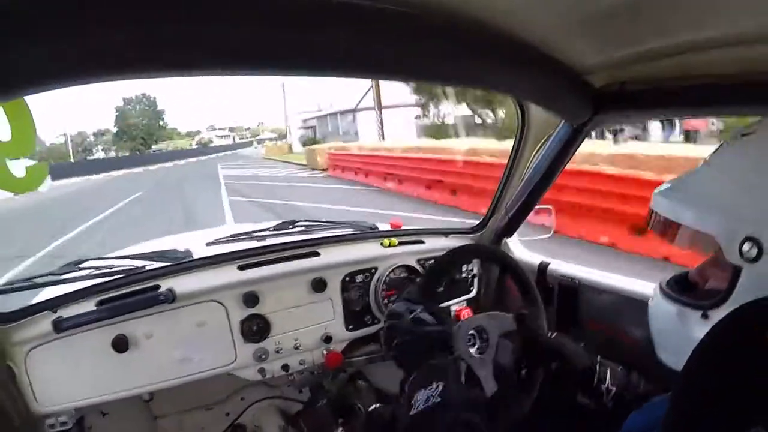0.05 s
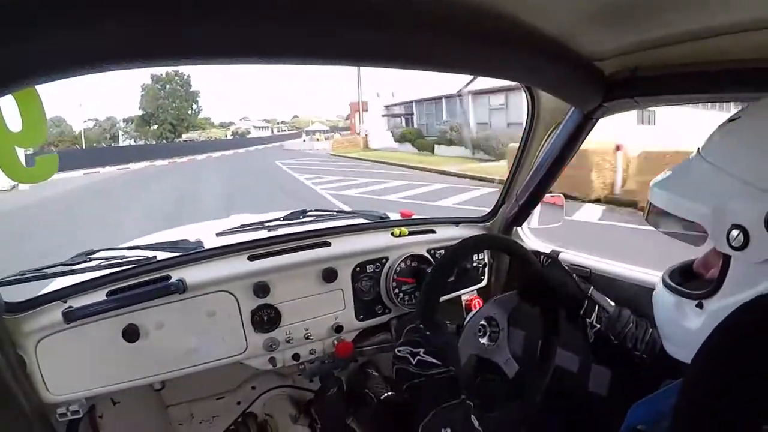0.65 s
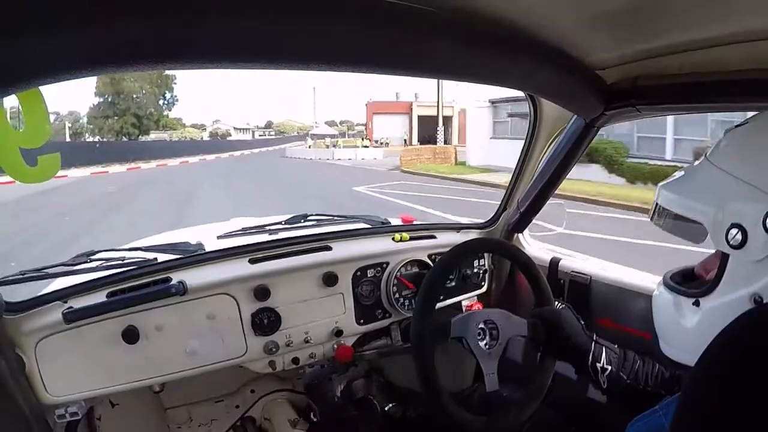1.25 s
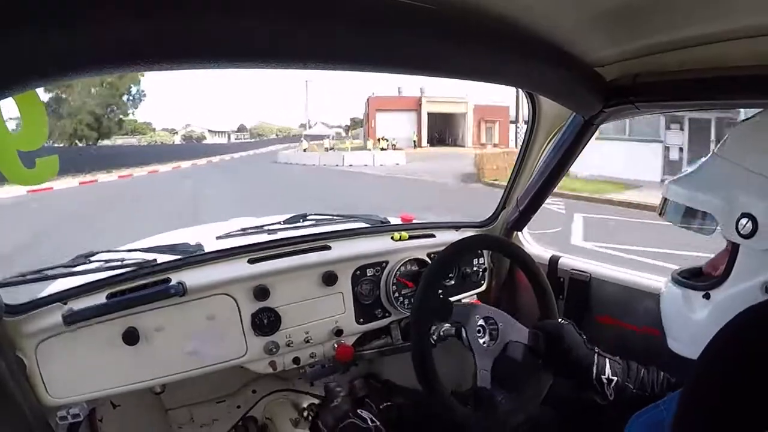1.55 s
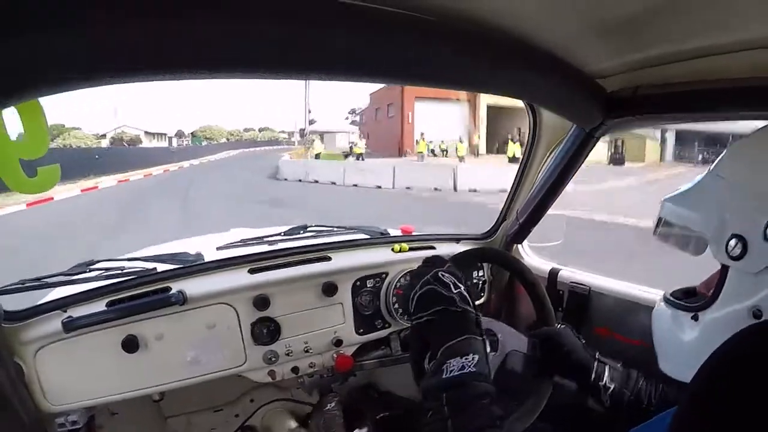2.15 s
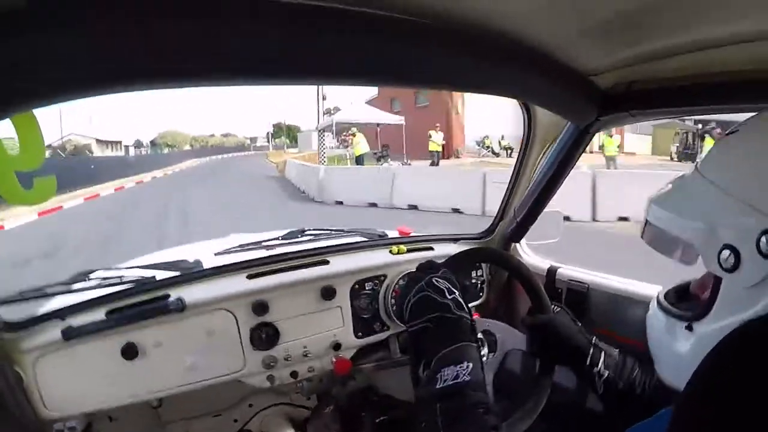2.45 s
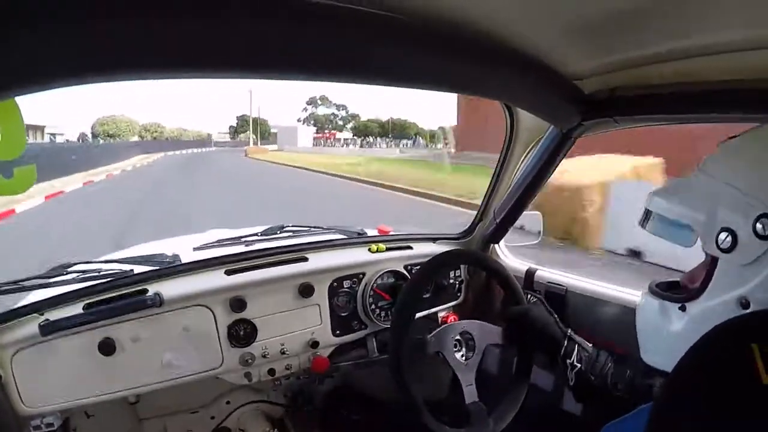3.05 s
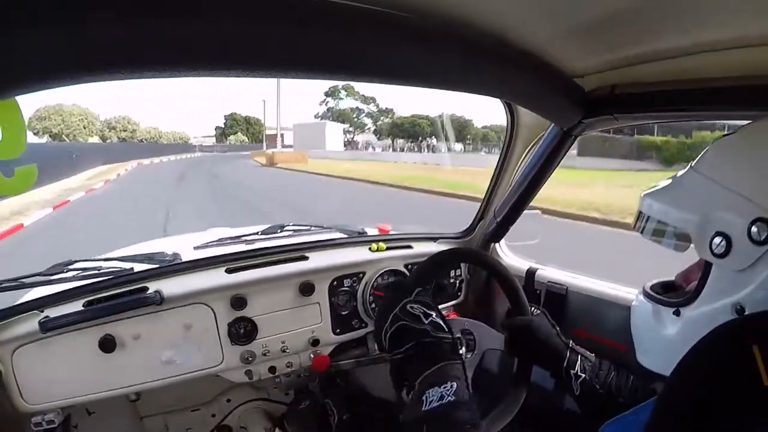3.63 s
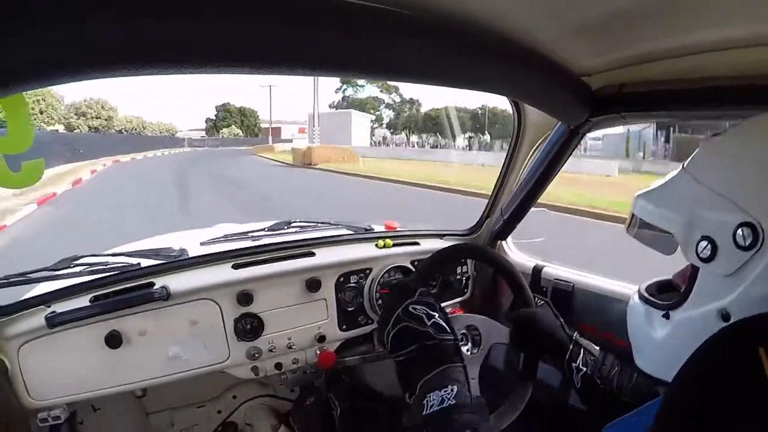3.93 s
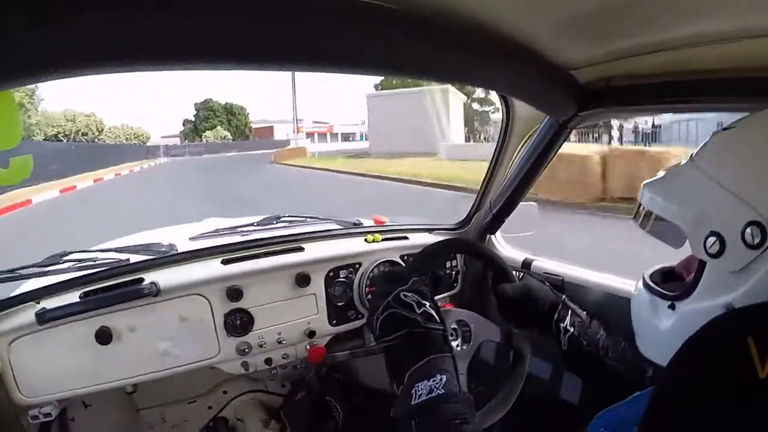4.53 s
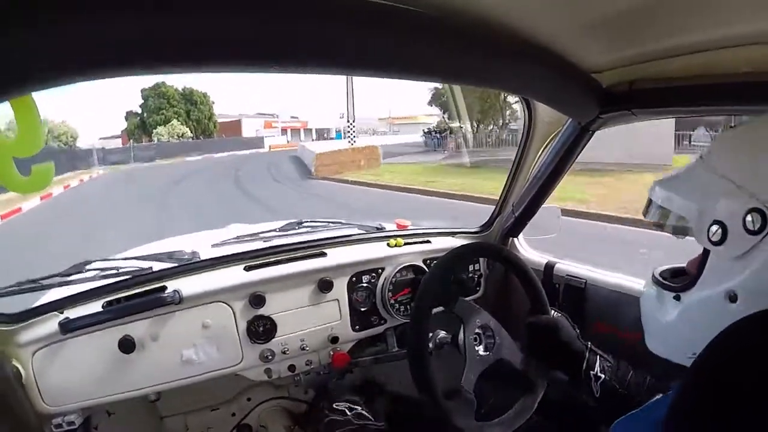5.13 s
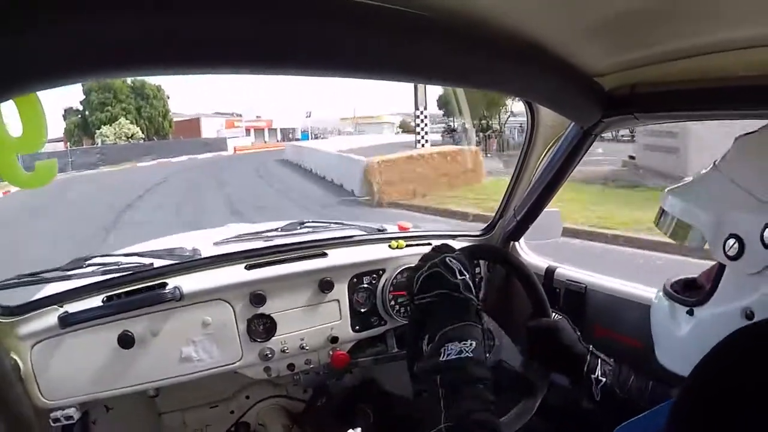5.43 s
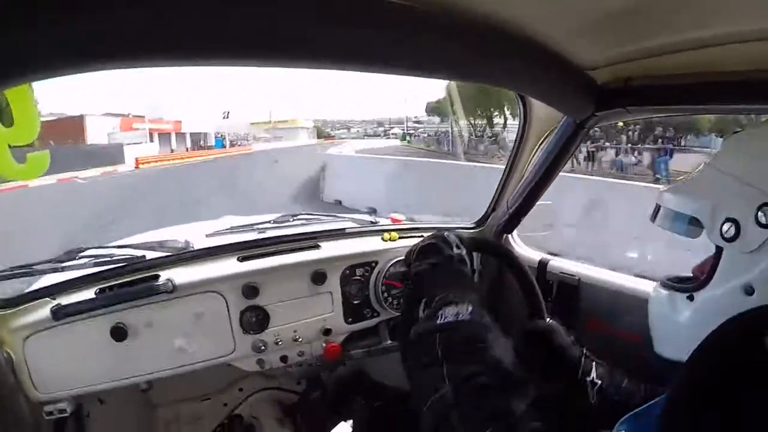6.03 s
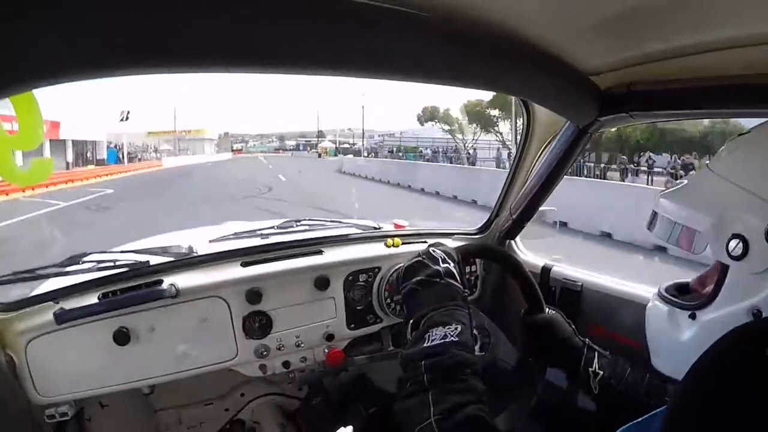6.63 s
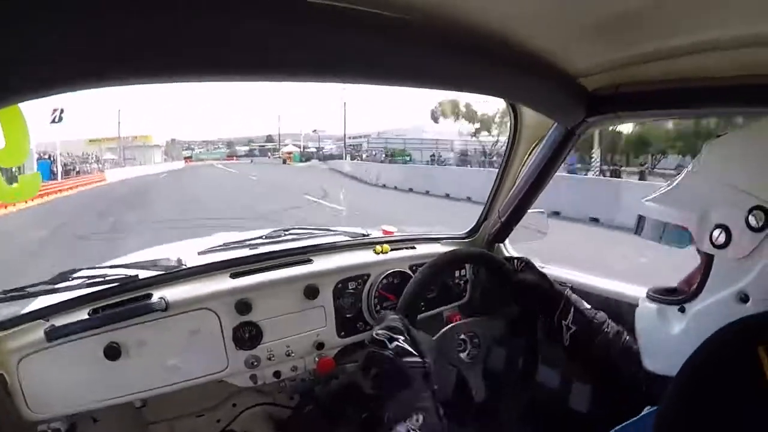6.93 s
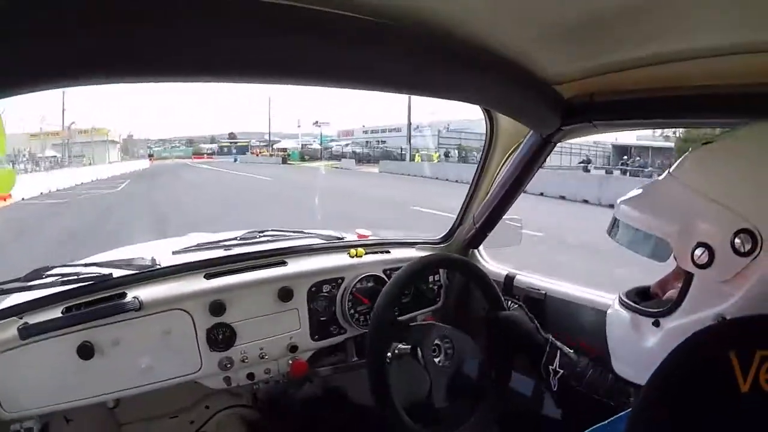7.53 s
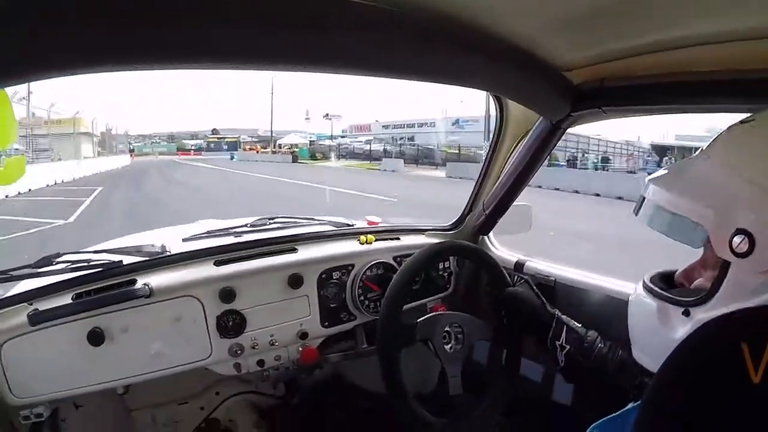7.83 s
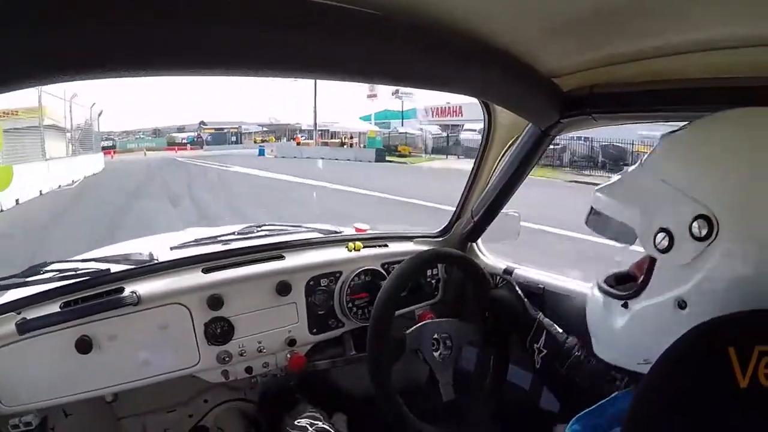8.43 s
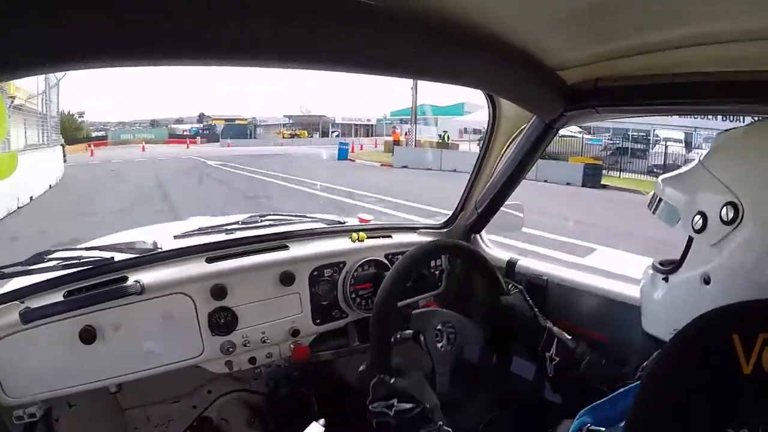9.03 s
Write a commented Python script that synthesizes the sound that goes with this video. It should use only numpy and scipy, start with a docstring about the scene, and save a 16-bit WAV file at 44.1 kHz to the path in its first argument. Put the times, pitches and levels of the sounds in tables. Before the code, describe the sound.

An air-cooled race car engine is heard throughout from inside a bare cabin, booming and raspy over fan hiss, road rumble and fine rattling. It climbs in pitch until about 1.4 seconds, dips quickly, then pulls back up to a peak near 3 seconds. From around 3.6 seconds the driver lifts off and the engine winds down with a ragged sputter, while a bump drums on the floor and a stone ticks faintly. At about 5.2 seconds a dull exhaust thud and a sharp throttle blip mark a downshift. The revs build unevenly, with a brief lift near 6.3 seconds and a few low bumps, peaking around 7.4 seconds. From 8 seconds the engine falls again, with one light push near 8.7 seconds. Loose panels buzz briefly early on and several times in the last few seconds.

```python
"""An air-cooled flat-four race car engine, heard from inside the bare cabin as the driver speeds up,
lifts off and blips down a gear. Its lowest tones boom in the body shell, and its uneven firing
pulses bark through the exhaust and ring the panels. The cooling fan and valves hiss, the road
rumbles and fittings rattle. Now and then a loose panel buzzes, unburnt fuel thuds in the exhaust,
a bump drums on the floor or a stone ticks against it."""
import sys
import numpy as np
from scipy import signal
from scipy.fft import rfft, irfft, next_fast_len
from scipy.io import wavfile
from scipy.ndimage import uniform_filter1d, minimum_filter1d, map_coordinates

SR = 44100
rng = np.random.default_rng(int(sys.argv[2]) if len(sys.argv) > 2 else 0)


def put_to_file(sound):
    """Save the sound as 16-bit audio at rate SR, in the file named by the first command-line argument."""
    columns = np.atleast_2d(sound).T  # one column per channel
    safe = np.clip(columns, -1, 1)
    whole_steps = np.round(safe * 32767)
    wavfile.write(sys.argv[1], SR, whole_steps.astype(np.int16))


N = 409248


def amp(db):
    """Turn decibels into a gain to multiply by."""
    return 10 ** (np.asarray(db) / 20)

def unit(x):
    """Scale a signal so its average size (rms) is 1."""
    return x / np.sqrt(np.mean(x ** 2) + 1e-20)

def steady(x):
    """Hold the average size near 1 over every tenth of a second."""
    return x / np.sqrt(np.abs(uniform_filter1d(x * x, SR // 10)) + 1e-9)

def curve(rows):
    """Join (time, value) points with straight lines, one value per sample."""
    return np.interp(np.arange(N) / SR, *np.transpose(rows))

def wobble(rate):
    """A smooth curve through `rate` random values a second."""
    return map_coordinates(rng.standard_normal(int(N * rate / SR) + 4), [np.arange(N) * rate / SR])

def filtered(x, response):
    """Scale and delay each frequency as response(hz) says."""
    size = next_fast_len(N + SR // 2)
    return irfft(rfft(x, size) * response(np.fft.rfftfreq(size, 1 / SR)), size)[:N]

def noise(spectrum):
    """Noise whose tone colour follows (frequency, level) points."""
    points_hz, db = np.transpose(spectrum)
    colour = lambda hz: amp(np.interp(np.log(hz + 1), np.log(points_hz), db))
    return unit(filtered(rng.standard_normal(N), colour))

def resonate(x, modes, low_hz, high_hz):
    """Let x ring a set of resonances, keeping the band from low_hz to high_hz."""
    def ring(f):
        return sum((-1) ** k * amp(db) * 1j * f * width / (hz * hz - f * f + 1j * f * width)
                   for k, (hz, width, db) in enumerate(modes))
    band = signal.butter(3, [low_hz, high_hz], 'band', fs=SR, output='sos')
    return unit(signal.sosfilt(band, filtered(x, ring)))

def arch(start, length):
    """One smooth rise from 0 to 1 and back."""
    return np.sin(np.pi * np.clip((np.arange(N) / SR - start) / length, 0, 1))

def swells(events, spectrum):
    """Noise that rises and falls once for each (start, length, level) row."""
    return sum(amp(db) * arch(start, length) for start, length, db in events) * steady(noise(spectrum))


# how fast the engine turns: (time [s], speed [turns a minute])
ENGINE_SPEED = [(0, 4946), (.18, 5153), (.3, 5411), (.43, 5345), (.6, 5490), (.72, 5820), (.86, 5990),
                (1.05, 6418), (1.27, 6650), (1.42, 6957), (1.58, 6450), (1.67, 5758), (1.73, 5513),
                (1.82, 5724), (2.27, 6276), (2.38, 6260), (2.6, 6689), (2.71, 6604), (2.99, 6810),
                (3.11, 6240), (3.2, 6540), (3.3, 5770), (3.63, 5993), (3.89, 5409), (4.05, 5270),
                (4.21, 4926), (4.65, 4700), (5.08, 4310), (5.19, 4020), (5.29, 5657), (5.45, 5260),
                (5.6, 5540), (5.79, 5636), (5.95, 5928), (6.05, 5793), (6.17, 6190), (6.36, 5850),
                (6.58, 6060), (7.1, 6627), (7.25, 6502), (7.41, 6781), (7.64, 6660), (7.75, 6353),
                (7.83, 6535), (7.95, 5724), (8.13, 5756), (8.54, 4830), (8.71, 5172), (8.98, 5147),
                (9.27, 4600)]
def crankshaft():
    """Engine speed and a running count of cycles; the shaft stumbles more when speed changes fast."""
    rpm = curve(ENGINE_SPEED)
    rpm_per_s = uniform_filter1d(np.abs(np.gradient(rpm)) * SR, size=4000)
    stumble = .0015 + .007 * np.clip(rpm_per_s / 3000 - .4, 0, 1)
    cycle = np.cumsum(rpm * (1 + stumble * wobble(40))) / SR / 120  # one cycle takes two turns
    return rpm, cycle

# pedal presses: (start [s], length [s], opening [0-1], firing tone boost [dB], growl boost [dB])
PEDAL_PRESSES = [(0, .66, 0.92, -2, 1), (0.649, 0.713, 0.63, 2, 3.5), (1.49, 0.776, 0.8, 1, 1.5),
                 (2.368, 0.653, 0.54, -2.5, -1), (3.088, 0.494, 0.86, 1, -3), (5.198, .57, 0.68, 1, 5.5),
                 (5.739, 0.488, 0.68, 1.5, -4), (6.216, 0.43, 0, -2, -12), (6.584, 1, 0.77, 0, -4),
                 (7.701, 0.363, 0.68, -2.5, -6.5), (8.576, 0.6, 0.36, -0.5, -1.5)]
def pedal(travel_s=0.064, lurch_s=0.068):
    """The pedal works the throttle; each move makes a lurch as the drive takes up its slack."""
    t = np.arange(N) / SR
    held = []
    for start, length, *_ in PEDAL_PRESSES:
        opening = (t - start) / travel_s + (start <= 0)  # a press at time 0 is already down
        closing = 1 - (t - start - length) / travel_s
        held.append(np.clip(np.minimum(opening, closing), 0, 1))
    throttle, firing_db, growl_db = np.array(PEDAL_PRESSES)[:, 2:].T @ np.array(held)
    lurch = signal.lfilter([1], [1, -np.exp(-1 / (lurch_s * SR))], np.abs(np.gradient(throttle)))
    return np.clip(throttle, 0, 1), np.clip(lurch, 0, 1), firing_db, growl_db

# the cylinders in firing order: (pulse strength [gain], place in the cycle [0-1])
FIRING_ORDER = [(0.58, .03), (0.14, 0.3), (0.34, .504), (0.32, .788)]
def firings(cycle, scatter_db=1, jitter=.001):
    """Each cylinder fires one pulse per cycle, a little different in size and timing each time."""
    pulses = np.zeros(N)
    for strength, place in FIRING_ORDER:
        timing, size = rng.standard_normal((int(cycle[-1]), 2)).T
        at = np.interp(np.arange(len(timing)) + place + jitter * timing, cycle, np.arange(N))
        pulses += np.bincount(at.astype(int), strength * amp(scatter_db * size), N)
    return unit(pulses)

def chuff(cycle, depth, lope):
    """Gas flow swells at each firing (depth) and once a cycle with the loudest cylinder (lope)."""
    angle = 2 * np.pi * cycle
    return unit(np.exp(depth * np.cos(len(FIRING_ORDER) * angle) + lope * np.cos(angle)))

def shell_echoes(x, longest_s=.016, points=60):
    """Echoes in the bare shell delay each frequency differently, smearing the pulses."""
    delay = lambda hz: np.interp(hz, np.linspace(0, 3500, points), longest_s * rng.random(points))
    return filtered(x, lambda hz: np.exp(-2j * np.pi * np.cumsum(delay(hz)) * hz[1]))

def drifting_overtones(x, depth_db=5.5):
    """Single overtones swell and sink over a few tenths of a second."""
    slices = signal.stft(x, nperseg=4096)[2]
    drift = uniform_filter1d(rng.standard_normal(slices.shape), size=6, axis=0)  # smooth in pitch
    drift = uniform_filter1d(drift, size=11, axis=1)  # and in time
    return unit(signal.istft(slices * amp(depth_db * unit(drift)), nperseg=4096)[1][:N])

# the engine's low tones: (waves per cycle [count], level pulling [dB], level coasting [dB])
LOW_TONES = [(2, -13.5, -16.5), (3, -16, -20), (4, -5, -10), (5, -11, -29.5), (6, -13, -15),
             (8, -14.5, -20.5), (12, -23, -33.5), (13, -17, -33)]
# how the cabin air favours some pitches: (frequency [Hz], gain [dB])
CABIN_RESPONSE = [(66, -9), (82, -4.5), (89, -1.5), (98, -18.5), (125, -12), (146, 1.5), (160, -5.5),
                  (178, -13.5), (195, -5.5), (209, -1.5), (223, -9.5), (245, -8), (272, -6.5), (298, -2.5),
                  (330, -12.5), (380, -24.5), (440, -7), (500, -18.5), (580, -3.5), (640, -14.5)]
def cabin_boom(cycle, rpm, throttle, firing_db, growl_db, waver_db=2.0):
    """Nearly pure engine tones, each swelling as it passes a pitch at which the cabin rings."""
    cabin_hz, cabin_db = np.transpose(CABIN_RESPONSE)
    firing = len(FIRING_ORDER)
    tones = 0
    for multiple, pull_db, coast_db in LOW_TONES:
        hz = multiple * rpm / 120
        db = coast_db + (pull_db - coast_db) * throttle + np.interp(hz, cabin_hz, cabin_db)
        db += firing_db * (multiple == firing) + growl_db * (firing < multiple < 2 * firing)
        phase = 2 * np.pi * (multiple * cycle + rng.random())
        phase += (0.036 + .03 * max(multiple - firing, 0)) * wobble(35)  # higher tones waver more
        tones += amp(db + waver_db * wobble(22)) * np.sqrt(2) * np.sin(phase)
    return tones

# exhaust and shell resonances, pulling and coasting: (frequency [Hz], width [Hz], level [dB])
PIPE_PULLING = [(434, 41, -6), (565.6, 29.5, 3), (654, 54, -3)]
PIPE_COASTING = [(456, 72, -9), (563, 90, -0.5), (684, 44, 3.5), (804, 32, -2)]
def exhaust_bark(cycle, pulses, throttle, level_db, sputter_db=2.2):
    """Firm pulses bark in the pipe; with the pedal up they turn ragged and higher, and sputter."""
    gas = rng.standard_normal(N) * chuff(cycle, depth=0.21, lope=0.093)
    pulling = resonate(pulses + amp(-9) * gas, PIPE_PULLING, low_hz=392, high_hz=810)
    coasting = resonate(pulses + amp(-2.5) * gas, PIPE_COASTING, low_hz=445, high_hz=817)
    blend = np.sqrt(throttle) * pulling + np.sqrt(1 - throttle) * coasting
    flutter_db = .8 * wobble(14) + sputter_db * (1 - throttle) * wobble(28)
    return amp(level_db + flutter_db) * steady(blend)

# intake and panel resonances: (frequency [Hz], width [Hz], level [dB])
PANEL_RINGS = [(903, 69, 3), (1159, 74, 1.5), (1373, 63, -3.5), (1572, 48, -6.5), (1724, 85, -5),
               (1891, 64, -4.5), (1985, 84, -8.5), (2817, 240, -15)]
def intake_rasp(cycle, pulses, throttle, level_db):
    """Intake pulses ring the panels over a rush of air, standing out as the throttle opens."""
    air = rng.standard_normal(N) * chuff(cycle, depth=0.34, lope=0.088)
    tone = amp(-4 + 11.5 * throttle) * resonate(pulses, PANEL_RINGS, low_hz=770, high_hz=3540)
    wide_rings = [(hz, 1.97 * width, db) for hz, width, db in PANEL_RINGS]
    rush = resonate(air, wide_rings, low_hz=960, high_hz=2610)
    return amp(level_db + 0.71 * wobble(14)) * steady(tone + rush)

# tone colour of the fan and valves: (frequency [Hz], level [dB])
FAN_COLOUR = [(700, -10), (1500, 4.5), (2100, 2.5), (2400, -1), (2800, 1), (3400, 1), (4000, -4.5),
              (5900, -5.5), (6600, -14), (7400, -22.5), (8700, -22.5), (10000, -33), (12000, -49),
              (15000, -63.5)]
# how their hiss rises and falls: (time [s], relative level [dB])
FAN_LEVEL = [(0.0, -30.5), (1.08, -31.5), (1.63, -28.5), (2.12, -32.5), (2.77, -28.5), (3.46, -30.5),
             (3.85, -36.5), (4.5, -30), (4.96, -28), (5.25, -32), (5.48, -26.5), (6.33, -32.5),
             (7.31, -28.5), (8.5, -32.5), (8.6, -28.5), (9.28, -27)]
def fan_hiss(cycle):
    """Cooling air and valve clatter, pulsing as the engine turns."""
    hiss = amp(curve(FAN_LEVEL) + 3.5 + 0.89 * wobble(12)) * noise(FAN_COLOUR)
    clatter = unit(amp(0.71 * wobble(450)))
    return hiss * chuff(cycle, depth=0.057, lope=0.029) * clatter

# tone colour of uneven burning: (frequency [Hz], level [dB])
BURBLE_COLOUR = [(80, -40), (115, -15), (150, -6.5), (200, -4), (280, -3.5), (330, -4.5), (380, -14.5),
                 (500, -15.5), (900, -52.5), (3000, -120)]
def burble(throttle, lurch, growl_db, rough_db):
    """Uneven burning fills in between the engine tones, most in a lurch, a growl or on rough road."""
    level_db = -18.5 - 0.48 * throttle + 2.5 * lurch + 0.28 * rough_db + 0.19 * growl_db
    return amp(level_db) * steady(noise(BURBLE_COLOUR))

# how rough the road is: (time [s], rumble level [dB])
ROAD_LEVEL = [(0.0, -24), (0.28, -30), (0.46, -25), (0.9, -36.5), (1.5, -30.5), (1.6, -22.5), (1.86, -37),
              (2.22, -35), (2.35, -23.5), (2.92, -29), (3.1, -27.5), (3.57, -45.5), (3.67, -31),
              (4.14, -32.5), (4.19, -22.5), (4.34, -36.5), (4.37, -25), (5.99, -23), (6.05, -22),
              (6.15, -32.5), (6.41, -25.5), (8.68, -23), (9.18, -17.5), (9.28, -32)]
# tone colours of the floor and the suspension: (frequency [Hz], level [dB])
FLOOR_COLOUR = [(45, -36.5), (66, -27), (76, -2), (85, 4.5), (96, -8), (115, -13.5), (200, -37.5),
                (1000, -120)]
RUMBLE_COLOUR = [(8, -25.5), (24, -8.5), (36, -0.5), (46, -2.5), (60, -12), (100, -36), (500, -120)]
def road_rumble(throttle, lurch):
    """The road shakes the suspension and drums on the floor; gives the sound and the roughness."""
    road_db = curve(ROAD_LEVEL)
    rough_db = road_db - road_db.mean()
    floor_db = -24 - throttle + 2 * lurch + .6 * rough_db + 2.9 * wobble(6.8)
    floor = amp(floor_db) * steady(noise(FLOOR_COLOUR))
    suspension = amp(road_db + 1.5 * lurch) * steady(noise(RUMBLE_COLOUR))
    return floor + suspension, rough_db

def ticks(hits, fade_s, attack_s=0.0014):
    """The loudness outline of hits: each rises quickly, then falls 60 dB in fade_s."""
    t = np.arange(SR // 4) / SR
    tick = amp(-60 * t / fade_s) * (1 - np.exp(-t / attack_s))
    return signal.fftconvolve(hits, tick)[:N]

# tone colour of small hard hits: (frequency [Hz], level [dB])
TICK_COLOUR = [(800, -29), (2500, -7), (5800, 2.5), (7400, -10), (9000, -9.5), (12000, -24.5),
               (15000, -36.5)]
# how loud the fine rattle is: (time [s], level [dB])
RATTLE_LEVEL = [(0, -56), (1.0, -50), (1.3, -48), (2.0, -46.5), (2.9, -43.5), (3.3, -50.5), (4.3, -46.5),
                (4.6, -41.5), (5.0, -46), (5.6, -49), (6.2, -55.5), (8.4, -54.5), (9.28, -54)]
def rattle(per_second=260, scatter_db=3):
    """Fittings and grit make many tiny hits at random moments."""
    hits = (rng.random(N) < per_second / SR) * amp(scatter_db * rng.standard_normal(N).clip(-2, 2))
    return amp(curve(RATTLE_LEVEL)) * unit(ticks(hits, fade_s=0.032)) * noise(TICK_COLOUR)

# loose panels buzzing: (start [s], length [s], pitch [Hz], level [dB])
LOOSE_PANELS = [(.51, .15, 1875, -25), (.74, .17, 2780, -31), (2.74, .26, 1865, -26),
                (6.92, .42, 1368, -31), (7.2, .15, 1738, -27), (7.55, .13, 1740, -28),
                (7.87, .26, 1915, -26), (8.62, .4, 2750, -32)]
def panel_buzzes(cycle):
    """A loose panel swells into a rough, wavering note, shaken by each engine cycle."""
    t, notes = np.arange(N) / SR, np.zeros(N)
    waver = .9 * wobble(110)
    for start, length, hz, db in LOOSE_PANELS:
        swell = np.sqrt(np.abs(arch(start, length)))
        notes += amp(db) * swell * np.sin(2 * np.pi * hz * t + waver)
    return notes * chuff(cycle, depth=0.31, lope=0.37)

# thuds in the exhaust: (start [s], length [s], level [dB])
FUEL_THUDS = [(2.29, 0.12, -11.5), (5.14, 0.25, -13.5), (8.407, .1, -17)]
def fuel_thuds():
    """Unburnt fuel thuds in the exhaust with a short, rough burble."""
    return swells(FUEL_THUDS, BURBLE_COLOUR)

# bumps in the road: (start [s], length [s], level [dB])
ROAD_BUMPS = [(4.15, .33, -13), (6.48, 0.14, -16), (6.8, .2, -17), (7.15, 0.41, -14.5)]
def road_bumps():
    """Each bump sets the floor booming like a drum."""
    return swells(ROAD_BUMPS, FLOOR_COLOUR)

# stones hitting the floor: (time [s], relative level [dB])
STONE_HITS = [(4.376, -23), (5.1594, -30), (5.649, -29), (6.34, -30), (6.5959, -28), (7.8194, -32)]
def stones():
    """Each stone strikes the floor with a short, dry tick."""
    hits = np.zeros(N)
    for time, db in STONE_HITS:
        hits[round(time * SR)] = amp(db - 6)
    return ticks(hits, fade_s=0.13) * noise(TICK_COLOUR)


def scene():
    """One crankshaft drives all the engine sounds; the pedal and speed set how loud they are."""
    rpm, cycle = crankshaft()
    throttle, lurch, firing_db, growl_db = pedal()
    octaves = np.log2(rpm / 6000)  # above or below cruising speed
    flare_db = 6 * lurch * throttle  # as the throttle snaps open
    sag_db = -12 * lurch * (1 - throttle)  # as the load drops away
    bark_db = -24.5 + 6 * throttle - 3.5 * octaves + flare_db + sag_db / 2
    rasp_db = -28 + 7.5 * throttle + 5.5 * octaves + flare_db
    pulses = drifting_overtones(shell_echoes(firings(cycle)))
    engine = amp(sag_db) * cabin_boom(cycle, rpm, throttle, firing_db, growl_db)
    engine += exhaust_bark(cycle, pulses, throttle, bark_db)
    engine += intake_rasp(cycle, pulses, throttle, rasp_db)
    engine += fan_hiss(cycle)
    road, rough_db = road_rumble(throttle, lurch)
    engine += burble(throttle, lurch, growl_db, rough_db)
    return (engine + road + rattle() + panel_buzzes(cycle) + fuel_thuds() + road_bumps() + stones())[None]

def record(dry, ceiling=.95, top_hz=15000):
    """A limiter briefly turns everything down under a loud boom, and the highest treble is cut."""
    needed = np.minimum(1, ceiling / (np.abs(dry[0]) + 1e-9))
    gain = uniform_filter1d(minimum_filter1d(needed, size=700), size=700)
    fade_in = np.minimum(1, np.arange(N) / 100)
    treble_cut = signal.butter(14, top_hz, fs=SR, output='sos')
    return signal.sosfilt(treble_cut, dry[0] * gain * fade_in)[None]


dry = scene()
out = record(dry)
put_to_file(out)
```